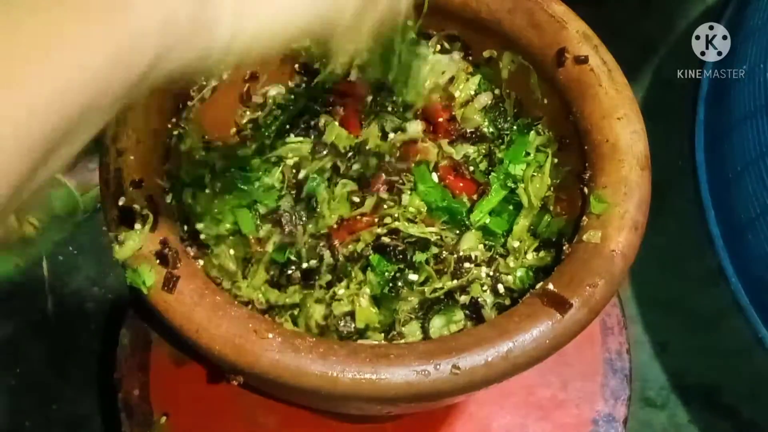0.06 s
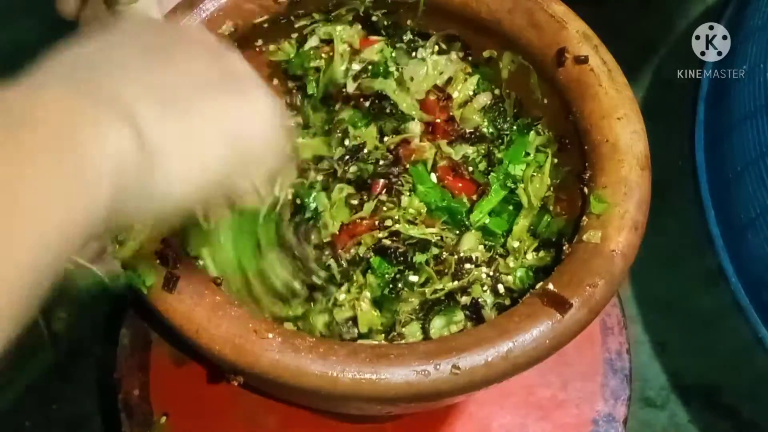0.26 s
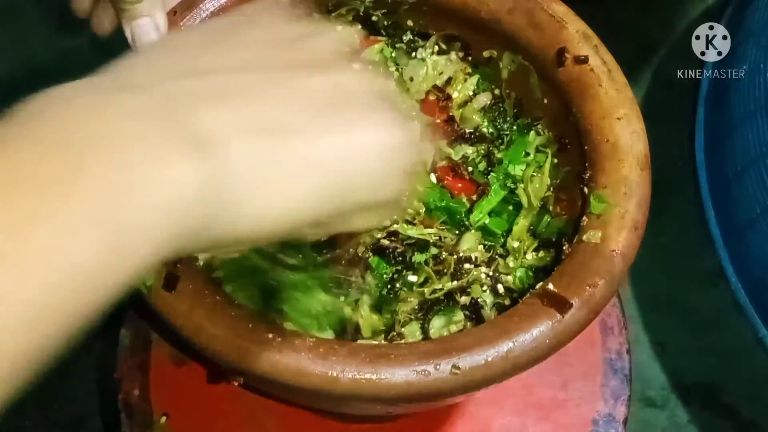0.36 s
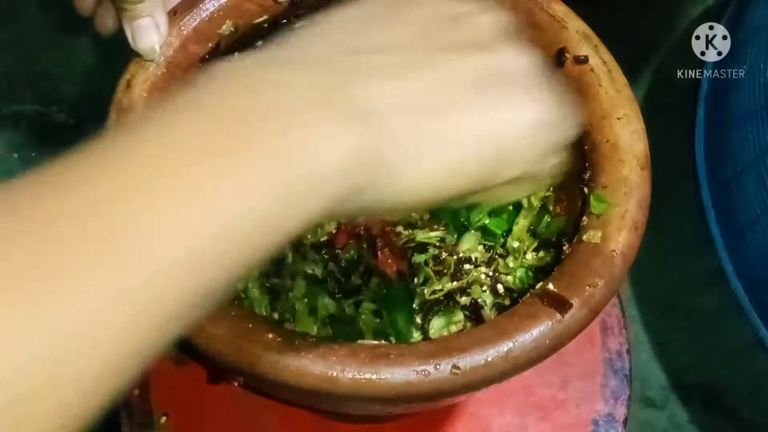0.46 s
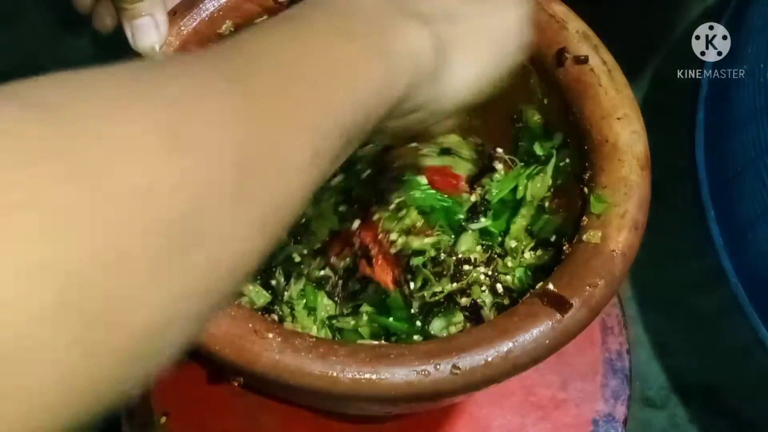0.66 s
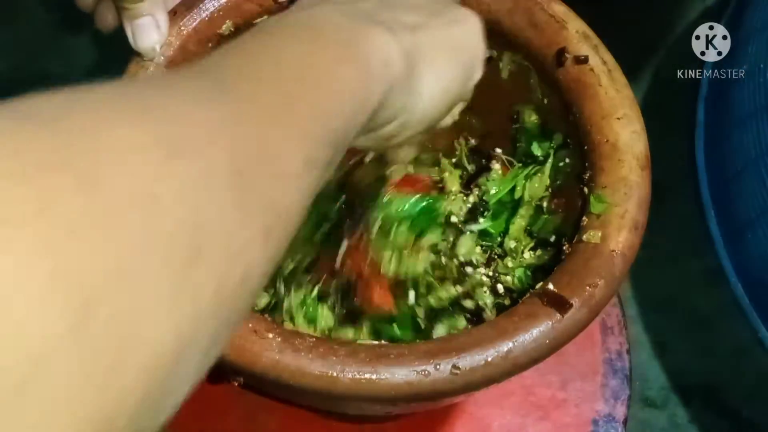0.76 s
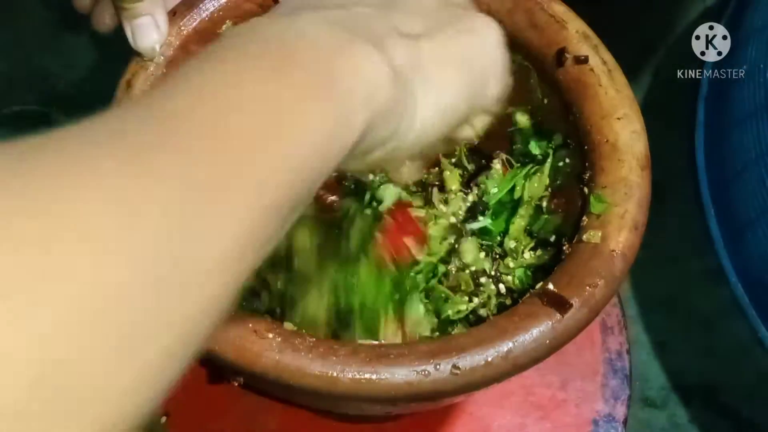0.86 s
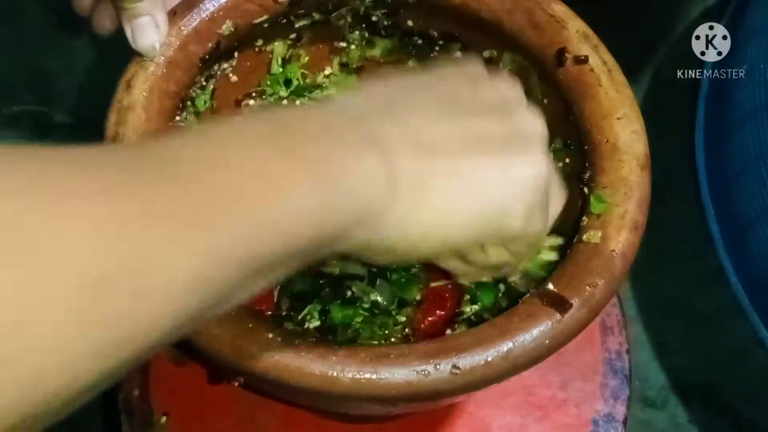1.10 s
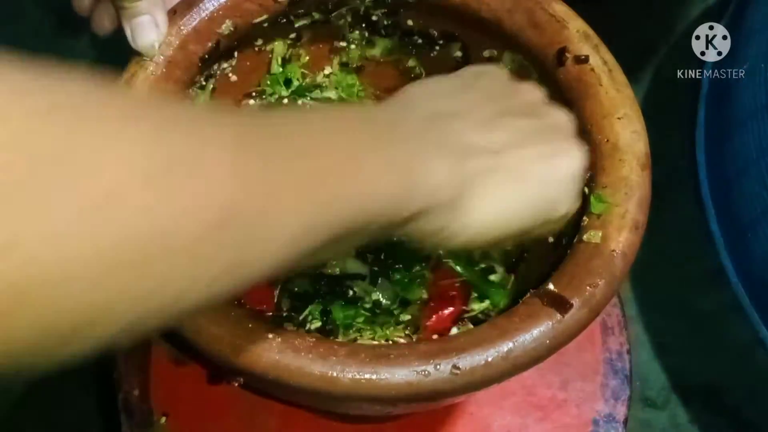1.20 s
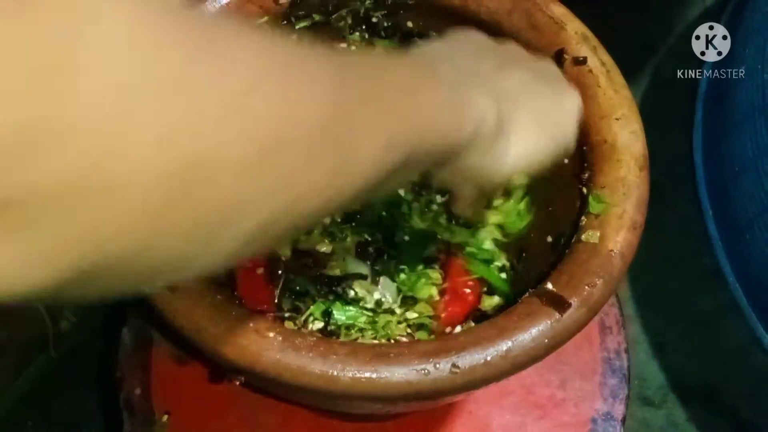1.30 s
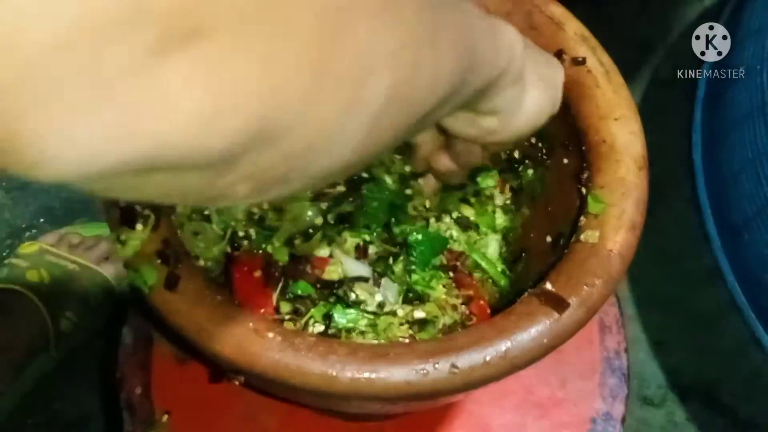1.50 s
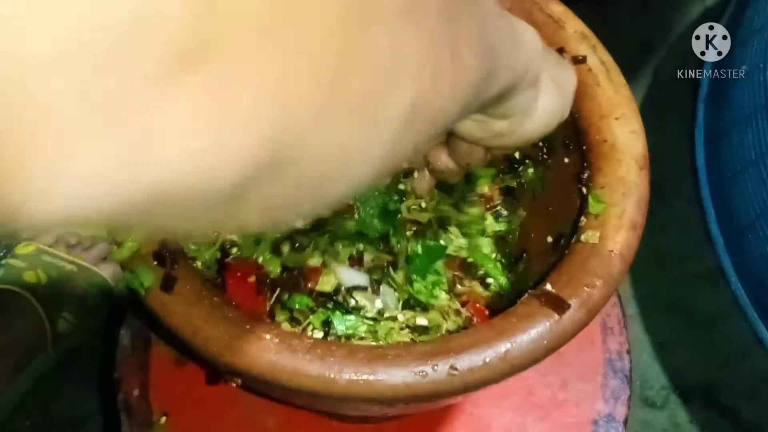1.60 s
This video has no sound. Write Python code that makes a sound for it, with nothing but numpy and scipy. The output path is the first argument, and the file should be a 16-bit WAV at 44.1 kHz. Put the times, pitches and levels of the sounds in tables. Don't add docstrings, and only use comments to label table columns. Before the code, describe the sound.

A spoon turns chopped food in a clay mortar, heard close in a small room. A previous knock still rings at the start; hard clustered knocks at 0.2-0.4 s sound the bowl's deep hollow tone with a rough scrape. A softer stroke comes at 0.65 s, then light bright gritty rubbing from 1.2 s. Faint hum, pulsing insect, very faint far hoots near 1 s and 1.5 s.

```python
import sys
import numpy as np
from scipy import signal
from scipy.fft import rfft, irfft, next_fast_len
from scipy.io import wavfile
from scipy.ndimage import uniform_filter1d, map_coordinates

SR = 44100
rng = np.random.default_rng(int(sys.argv[2]) if len(sys.argv) > 2 else 0)


def invert_db(x):
    u = np.asarray(x, float) / 20
    return 10 ** u


def pcm_store(signal):
    levels = np.round(np.clip(np.atleast_2d(signal), -1, 1) * 32767)
    wavfile.write(sys.argv[1], SR, levels.astype(np.int16).T)


N = 72765
LEAD = 8820
M = N + LEAD
TIME_S = (np.arange(M) - LEAD) / SR

# time in seconds, peak in dB, clay ring in dB, brightness in dB.
KNOCKS = [(0.2115, -11, 4.5, 12.5), (0.2811, -20, -11, 1), (0.288, -5.5, -1.5, 7), (0.293, -9, -10, -13),
          (0.3372, -20, 5, -12), (0.3589, -17, -31, -16), (0.3693, -12.5, -9, -23),
          (0.377, -23.5, -14, -13), (0.641, -70, -19.5, 5), (0.6595, -38, -29.5, 9), (0.687, -21, -37, -19),
          (1.0118, -48, -25, -7), (1.18, -71, -18, 23), (1.2176, -45, -16, 24), (1.2414, -32.5, -44, 20),
          (1.2492, -41, -40, 19), (1.2628, -29, -34, 20.5), (1.2648, -31, -38, 28), (1.267, -30, -36, 16),
          (1.2725, -27, -40, -1), (1.3167, -34, -42, 23.5), (1.3232, -28.5, -42, 22.5),
          (1.339, -26.5, -40, 14), (1.3716, -24.5, -40, 13), (1.379, -22.5, -23, -14),
          (1.385, -22, -34, -12), (1.459, -56, -30, 10), (1.4706, -32, -24, -3), (1.479, -31, -21, -8),
          (1.489, -36, -32, -9)]
EARLIER_S, EARLIER_DB = 0.0024, -20.5
BLOW_T60_S, BLOW_RISE_S = 0.011, 0.0004
# time in seconds, pressure in dB, bare clay in dB, fine grit in dB.
STROKES = [
    [(0, -51, 9.5, 18), (.074, -67.5, -16, 14.5), (.096, -54, -7, 10), (.2, -63, -8.5, 1.5)],
    [(.212, -26, 2.5, -7), (.278, -45.5, -19, 13)],
    [(.281, -32, -28, -0.5), (.2868, -22.5, -31, -12), (.2878, -20, -2.5, 0), (.335, -23, -5.5, 0),
     (.372, -30.5, -9, -2), (.39, -40.5, 3, -6), (.46, -54.5, 2.5, 10.5)],
    [(.64, -75, -35, 29), (.662, -58, -19, 10), (.6858, -42, -27, 10.5), (.687, -28.5, -5.5, -2),
     (.716, -35, -21, 4.5), (.745, -36.5, -25, 5), (.776, -39, -38, 0), (.79, -59.5, -43, -13),
     (.85, -59.5, -28, -33)],
    [(1.18, -62.5, -37, 17.5), (1.241, -53.5, -27, 16), (1.243, -34.5, -44, 21), (1.31, -34.5, -13, 11.5),
     (1.345, -36, -16, 14), (1.386, -37, -42, 2), (1.405, -39, -19, 5), (1.495, -41.5, -3, 1),
     (1.503, -51.5, -8, -5), (1.65, -57.5, -8, -13)],
]
# centre in Hz, width in Hz, level in dB.
VOICES = [
    [(500, 910, 3), (2360, 1120, 7.5), (3810, 1390, -1), (9730, 410, -4.5)],
    [(500, 80, 5.5), (2000, 560, -1.5), (3410, 360, 5.5), (4660, 1060, -7.5), (7550, 460, -6.5),
     (9570, 610, -4), (11140, 540, 0)],
    [(451, 135, 5), (657, 315, 1), (2000, 570, -6), (3087, 342, 8), (3232, 308, 11), (4200, 330, -3),
     (5800, 590, -16), (9600, 180, -0.5), (11300, 640, -17)],
    [(515, 76, 11.5), (2620, 244, 7.5), (3310, 280, 7), (4280, 182, 5.5), (6770, 1600, -15),
     (9610, 540, 2.5), (10160, 1000, -2)],
    [(540, 81, 12), (1684, 230, 0), (2030, 187, 3), (2800, 474, 2.5), (4395, 380, -9), (6240, 560, -17),
     (7430, 290, -18.5), (9770, 330, -10), (11340, 210, -21), (12500, 300, -19)],
]

GRAINS_PER_S, GRAIN_T60_S, GRAIN_SCATTER_DB = 2500, 0.0029, 2.5
PATCH_DB = 2.3
WALL_DB, GRIT_HZ = -24.5, 5740

# time in seconds, pitch in Hz, level in dB.
BLADE_TRACK = [(0, 2490, 4), (0.281, 2560, -4), (0.299, 3140, -5), (0.336, 2350, -5), (.372, 2420, 3),
               (.5, 2350, -4), (0.661, 3000, -4), (.7, 2600, -5.5), (0.749, 2860, -12), (0.77, 1920, 0),
               (.9, 2000, -13), (1.235, 3600, -24), (1.243, 3830, -5.5), (1.29, 3645, -9.5),
               (1.351, 3350, 5.5), (1.387, 2800, 3), (1.495, 2460, -6), (1.65, 2000, -14)]
BLADE_WIDTH_HZ, BLADE_DB = 380, 2

# pitch in Hz, level in dB, T60 in seconds.
RIM = [(1150, -6, 0.06), (2355, -20, 0.2), (2466, -2, 0.3), (2482, -4, 0.1)]
# pitch in Hz, level in dB, T60 in seconds.
BELLY = [(2670, -10, 0.15), (2900, -10, .15), (3165, -10, 0.14), (3233, -4, 0.29), (3272, -9, 0.15),
         (3408, -10, .15), (3690, -12, .15), (4040, -13, 0.16), (4253, -7, 0.14), (4310, -10, .1)]
RIM_RUB_DB, BELLY_TAP_DB = -10, -21

# time in seconds, level in dB, rise in seconds, T60 in seconds, upper mode in dB.
NUDGES = [
    (-.02, -0.5, .002, 0.27, -7),
    (.2115, 10, 0.0015, 0.39, 2),
    (.297, 23, 0.0087, 0.14, -23),
    (.388, 9, 0.0051, 0.22, -25),
    (.667, -18.5, .003, 0.09, -6),
    (.7, -7, 0.0048, 0.13, -5),
    (.737, -5.5, .004, 0.38, -16),
]
LOW_HZ, LOW_UPPER_HZ, LOW_UPPER_T60_S = 960, 979, 0.34
LOW_RUB_DB, LOW_RUB_T60_S = -9, 0.14
CHOKE_S = 0.14

# time in seconds, level in dB.
THUDS = [
    (0.2125, 2.5),
    (0.2864, -9),
    (0.6869, -2.5),
]
THUD, HOLLOW = (242, 122, 0), (550, 56, -2)

# time in seconds, level in dB, width in seconds.
HANDLING = [
    (0, -52.5, 0.014),
    (.42, -60.5, 0.027),
    (0.711, -55, 0.035),
    (1.3, -64.5, 0.075),
    (1.45, -61.5, 0.076),
]
PUSH_HZ, PUSH_WIDTH_HZ = 96, 180

# frequency in Hz, T60 in seconds.
ROOM = [(200, 0.32), (2000, 0.28), (10000, 0.14)]
ROOM_DB = -10
# frequency in Hz, gain in dB.
MIC = [(100, -31), (300, -5.5), (1300, -2.5), (3000, -3), (5400, 1.5), (11000, -3.5), (13000, -11),
       (15200, -4.5)]
LOW_CUT_HZ, TOP_HZ = 60, 15500

INSECT_HZ, INSECT_WIDTH_HZ, INSECT_DB, INSECT_DEPTH_DB = 6075, 446, -72.5, 7
SWELLS_PER_S, SWELL_TOP_S = 7.35, 0.975

# time in seconds, pitch in Hz, level in dB.
HOOT = [
    [(.99, 480, -76), (1.04, 485, -73), (1.11, 500, -71), (1.14, 730, -75.5), (1.2, 758, -70)],
    [(1.515, 806, -55.5), (1.55, 805, -53.5), (1.567, 802, -62), (1.585, 825, -51.5), (1.62, 813, -51.5),
     (1.65, 806, -55.5)],
]

# frequency in Hz, density in dB per Hz.
HUM = [(30, -40), (75, -1.5), (300, -11.5), (1500, -19), (2600, -10), (5140, -23.5), (9500, -23.5),
       (13000, -37.5)]
# centre in Hz, width in Hz, lift in dB.
HUM_PEAKS = [(480, 68, 6), (3350, 140, 8.5), (9200, 370, -1)]
HUM_DB = -62.5


def unit(x):
    return x / np.sqrt(np.mean(x ** 2) + 1e-20)


def along(points, hz):
    f, v = np.transpose(points)
    return np.interp(np.log(hz + 1), np.log(f + 1), v)


def filtered(x, response):
    m = next_fast_len(x.shape[-1] + SR // 2)
    spectrum = rfft(x, m) * response(np.fft.rfftfreq(m, 1 / SR))
    return irfft(spectrum, m)[..., :x.shape[-1]]


def peaks(table, f):
    total = 0
    for k, (hz, width_hz, db) in enumerate(table):
        damping = 1j * f * width_hz
        total = total + (-1) ** k * invert_db(db) * damping / (hz * hz - f * f + damping)
    return total


def wobble(knots_per_s):
    knots = rng.standard_normal(int(M * knots_per_s / SR) + 4)
    return map_coordinates(knots, [np.arange(M) * knots_per_s / SR])


def patchy(x, depth_db, size):
    z = signal.stft(np.pad(x, (0, size)), nperseg=size)[2]
    field = uniform_filter1d(rng.standard_normal(z.shape), 6, 0)
    field = uniform_filter1d(field, 4, 1)
    return signal.istft(z * invert_db(depth_db * unit(field)), nperseg=size)[1][:M]


def spoon():
    out, rubbed, tapped = np.zeros((3, M))
    bursts = knock_bursts()
    tapped[LEAD + round(EARLIER_S * SR)] = invert_db(EARLIER_DB + 11.5)
    starts_s = [rows[0][0] - 0.003 for rows in STROKES]
    for k, (rows, voice) in enumerate(zip(STROKES, VOICES)):
        s, press_db, bare_db, fine_db = np.transpose(rows)
        span_s = [s[0] - 0.001, *s, s[-1] + 0.096]
        rub = grit() * invert_db(np.interp(TIME_S, span_s, [-100, *press_db, -100]))
        rubbed += rub * invert_db(np.interp(TIME_S, s, bare_db))
        blows = np.zeros(M)
        for (when_s, db, ring_db, bright_db), burst in zip(KNOCKS, bursts):
            if np.searchsorted(starts_s, when_s) - 1 == k:
                i = LEAD + round(when_s * SR)
                blows[i:i + 600] += invert_db(db - 5.0) * shelf(burst, bright_db)
                tapped[i + 4] += invert_db(db + ring_db + 16.5)
        coarse = shelf(rub, -29)
        fine = (rub - coarse) * invert_db(np.interp(TIME_S, s, fine_db))
        force = coarse + fine + blows
        out += invert_db(6) * filtered(force, lambda f: peaks(voice, f) + invert_db(WALL_DB))
        out += invert_db(13) * blade(force)
    return out + clay(rubbed, tapped) + low_pair() + thud()


def knock_bursts():
    t = np.arange(600) / SR
    envelope = invert_db(-60 * t / BLOW_T60_S) * (1 - np.exp(-t / BLOW_RISE_S))
    bursts = rng.standard_normal((len(KNOCKS), 600)) * envelope
    bursts[:, 4] += 5
    return bursts


def grit():
    sizes = invert_db(GRAIN_SCATTER_DB * np.minimum(rng.exponential(1, M), 3))
    slips = (rng.random(M) < GRAINS_PER_S / SR) * sizes
    decay = invert_db(-60 * np.arange(200) / SR / GRAIN_T60_S)
    slip_level = unit(signal.fftconvolve(slips, decay)[:M])
    hiss = patchy(rng.standard_normal(M), PATCH_DB, size=256)
    return unit((slip_level + 0.74) * hiss * invert_db(2.2 * wobble(70)))


def shelf(x, db):
    high = filtered(x, lambda f: (1j * f / (GRIT_HZ + 1j * f)) ** 2)
    return x + (invert_db(db) - 1) * high


def blade(force):
    s, hz, db = np.transpose(BLADE_TRACK)
    turn = np.exp(2j * np.pi * np.cumsum(np.interp(TIME_S, s, hz)) / SR)
    pole = np.exp(-np.pi * BLADE_WIDTH_HZ / SR)
    slow = signal.lfilter([(1 - pole) ** 2], np.poly([pole, pole]), force / turn)
    return 2 * invert_db(BLADE_DB + np.interp(TIME_S, s, db)) * (slow * turn).real


def ring(modes):
    t = np.arange(SR // 2) / SR
    return 0.03 * sum(invert_db(db - 60 * t / t60_s) * np.sin(2 * np.pi * hz * t) for hz, db, t60_s in modes)


def clay(rubbed, tapped):
    low = signal.fftconvolve(rubbed, ring([(LOW_HZ, LOW_RUB_DB, LOW_RUB_T60_S)]))[:M]
    rim = signal.fftconvolve(invert_db(RIM_RUB_DB) * rubbed + tapped, ring(RIM))[:M]
    belly = signal.fftconvolve(rubbed + invert_db(BELLY_TAP_DB) * tapped, ring(BELLY))[:M]
    return low + rim + belly


def low_pair():
    out = np.zeros(M)
    for s, db, rise_s, t60_s, upper_db in NUDGES:
        t = np.maximum(TIME_S - s, 0)
        lower = np.sin(2 * np.pi * LOW_HZ * t)
        upper = invert_db(upper_db - 60 * t / LOW_UPPER_T60_S) * np.sin(2 * np.pi * LOW_UPPER_HZ * t)
        decay = invert_db(db - 35 - 60 * t / t60_s - 10 * (t / CHOKE_S) ** 6)
        out += decay * (1 - np.exp(-t / rise_s)) * (lower + upper)
    return out


def thud():
    taps = np.zeros(M)
    for s, db in THUDS:
        taps[LEAD + round(s * SR)] = invert_db(db + 12.0)
    return filtered(taps, lambda f: peaks([THUD], f) ** 2 + peaks([HOLLOW], f))


def handling():
    noise = rng.standard_normal(M)
    low = unit(filtered(noise, lambda f: peaks([(PUSH_HZ, PUSH_WIDTH_HZ, 0)], f) ** 2))
    return low * sum(invert_db(db) * np.exp(-((TIME_S - s) / width_s) ** 2) for s, db, width_s in HANDLING)


def room(x):
    hz, t, z = signal.stft(rng.standard_normal(SR // 2), SR, nperseg=256)
    decay = invert_db(-60 * t / along(ROOM, hz)[:, None])
    tail = signal.istft(z * decay, SR, nperseg=256)[1]
    delayed = np.pad(x, (250, 0))
    return signal.fftconvolve(delayed, tail / np.linalg.norm(tail))[:M]


def insect():
    noise = rng.standard_normal(M)
    rasp = unit(filtered(noise, lambda f: peaks([(INSECT_HZ, INSECT_WIDTH_HZ, 0)], f) ** 2))
    swell = np.cos(2 * np.pi * SWELLS_PER_S * (TIME_S - SWELL_TOP_S))
    return rasp * invert_db(INSECT_DB + INSECT_DEPTH_DB * swell + 4.5 * wobble(3))


def hoot():
    out = np.zeros(M)
    for s, hz, db in map(np.transpose, HOOT):
        level_db = np.interp(TIME_S, [s[0] - 0.02, *s, s[-1] + 0.023], [-110, *db, -110])
        phase = 2 * np.pi * np.cumsum(np.interp(TIME_S, s, hz)) / SR
        out += np.sqrt(2) * invert_db(level_db + wobble(37.1)) * np.sin(phase)
    return out


def house():
    z = signal.stft(rng.standard_normal(M + 512), nperseg=512)[2]
    field = uniform_filter1d(rng.standard_normal(z.shape), 6, 0)
    field = uniform_filter1d(field, 12, 1)
    noise = signal.istft(z * invert_db(1.4 * unit(field)), nperseg=512)[1][:M]

    def response(f):
        lift_db = sum(db * np.exp(-((f - hz) / width_hz) ** 2) for hz, width_hz, db in HUM_PEAKS)
        return invert_db(along(HUM, f) + lift_db)

    return invert_db(HUM_DB) * unit(filtered(noise, response))


def scene():
    near = spoon()
    near = near + invert_db(ROOM_DB) * room(near)
    gain = invert_db(2 * along(MIC, np.linspace(0, SR / 2, 129)))
    colour = signal.firwin2(257, np.linspace(0, 1, 129), gain)
    near = signal.lfilter(signal.minimum_phase(colour), 1, near)
    return (near + house() + insect() + hoot() + handling())[None, LEAD:]


def band_limit(x):
    return signal.sosfilt(signal.butter(12, 16490, fs=SR, output="sos"), x)


def record(dry):
    def band(f):
        return (1j * f / (LOW_CUT_HZ + 1j * f)) ** 2 / (1 + (f / TOP_HZ) ** 60)

    mix = filtered(dry, band)
    return band_limit(mix)


dry = scene()
out = record(dry)
pcm_store(out)
```